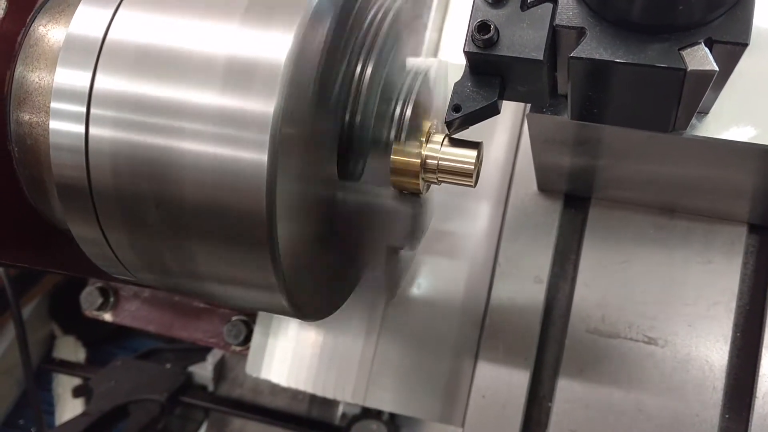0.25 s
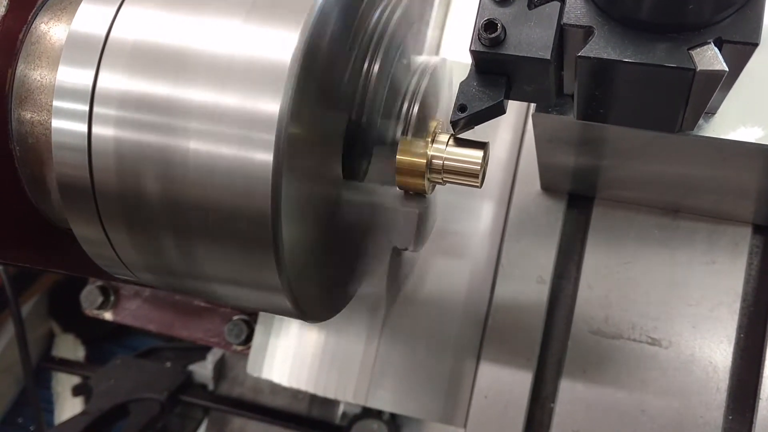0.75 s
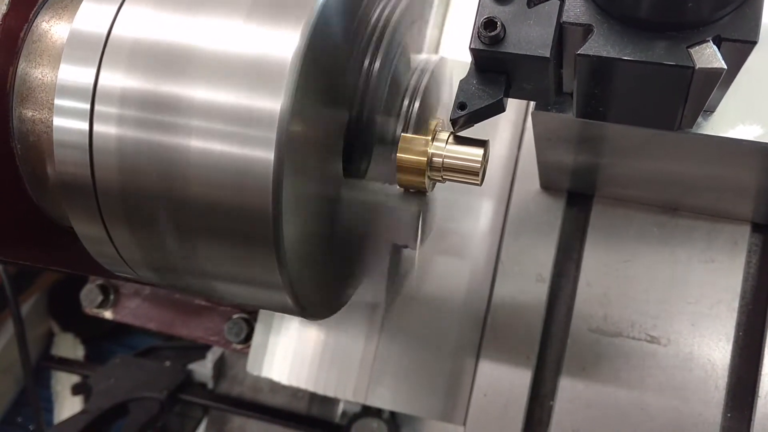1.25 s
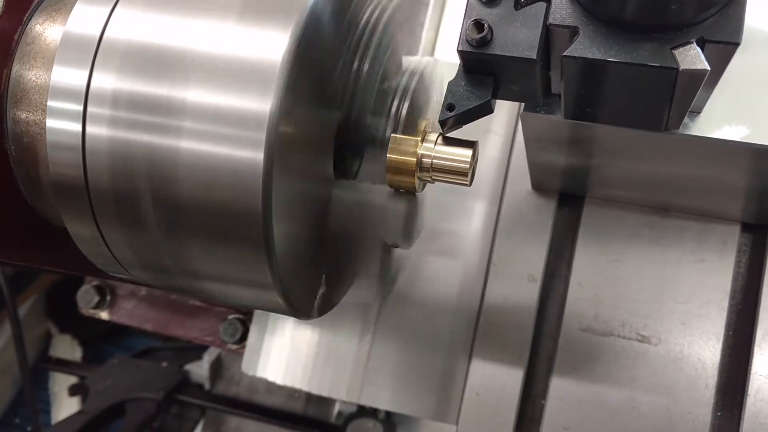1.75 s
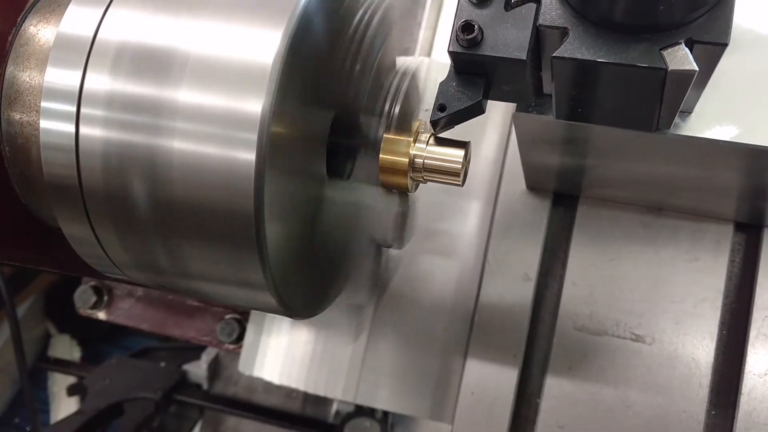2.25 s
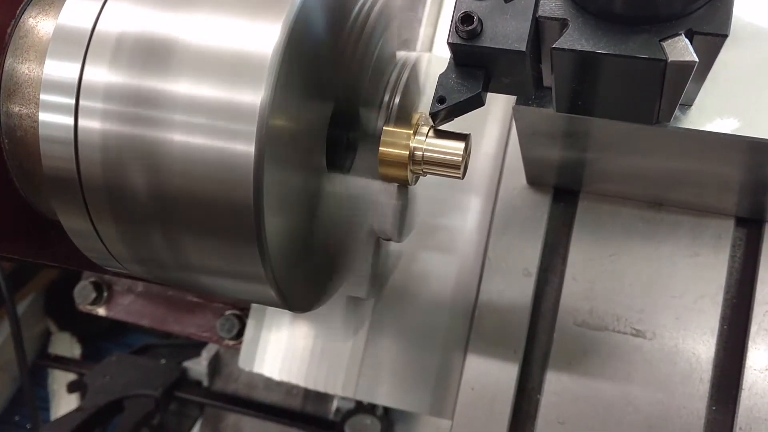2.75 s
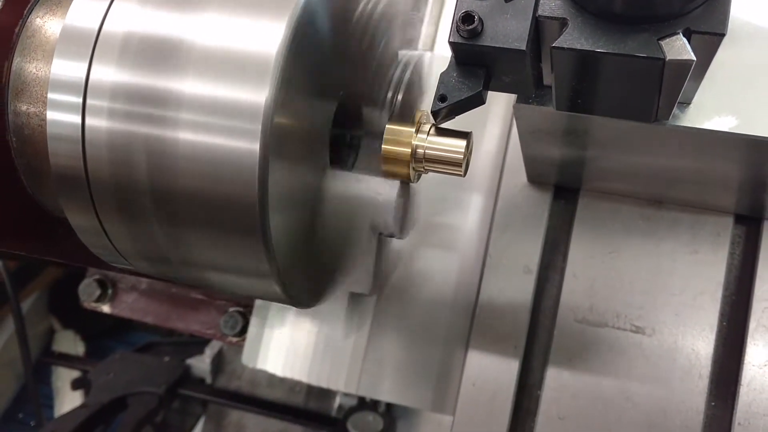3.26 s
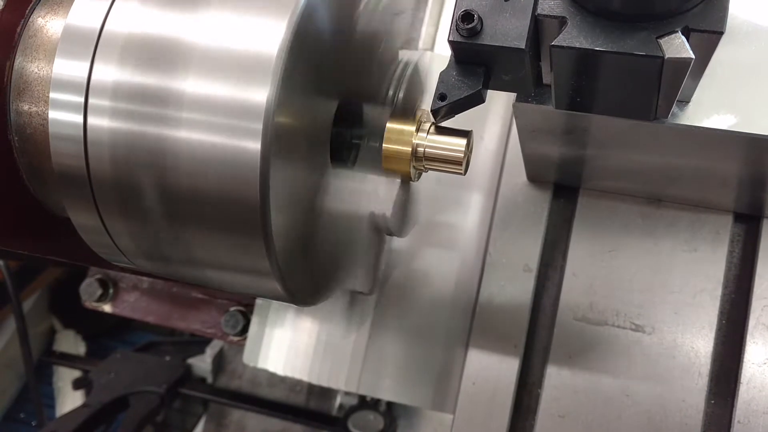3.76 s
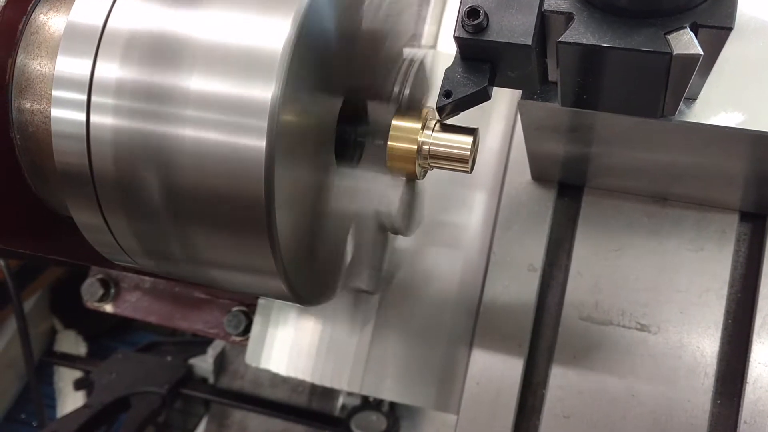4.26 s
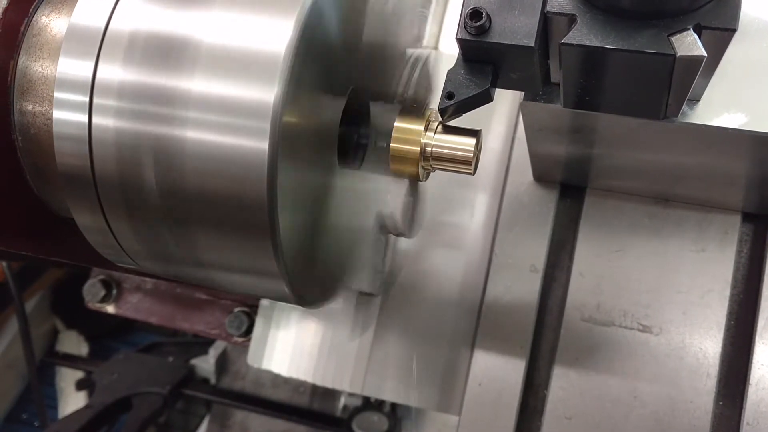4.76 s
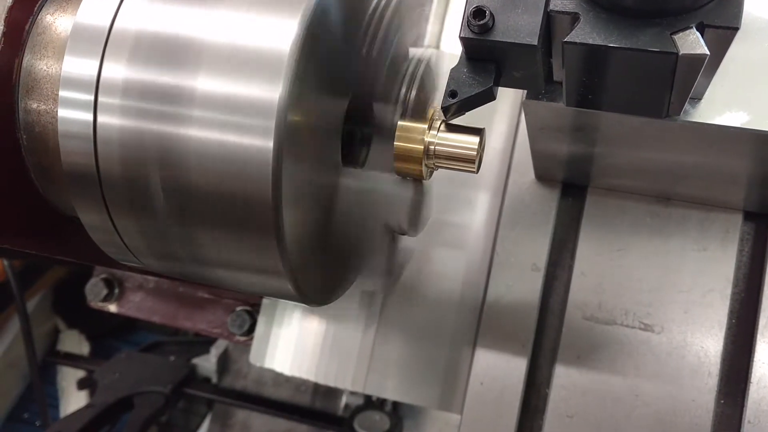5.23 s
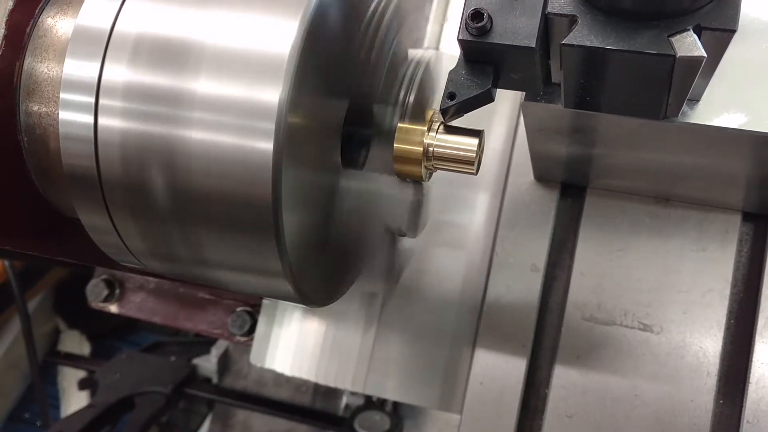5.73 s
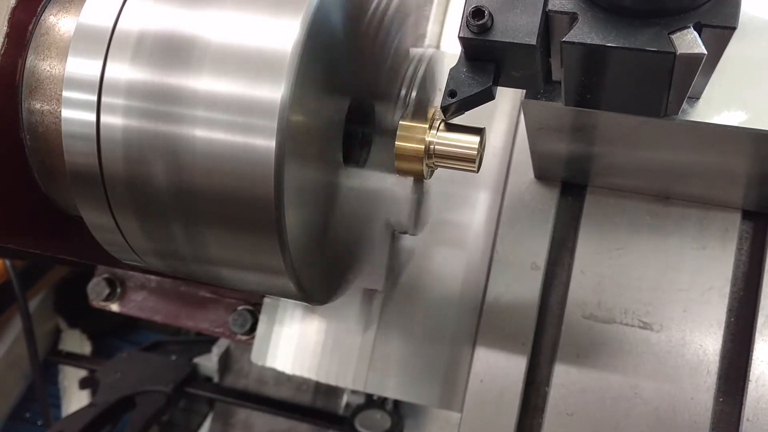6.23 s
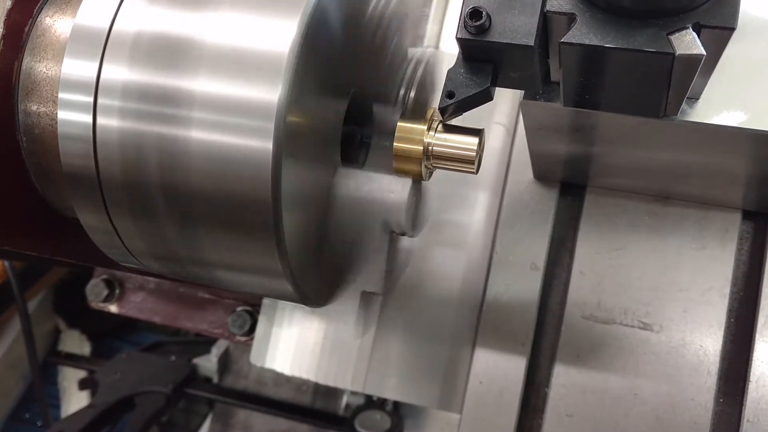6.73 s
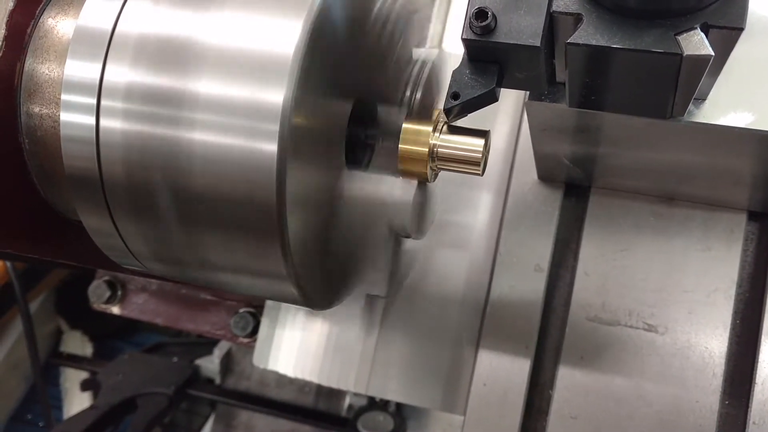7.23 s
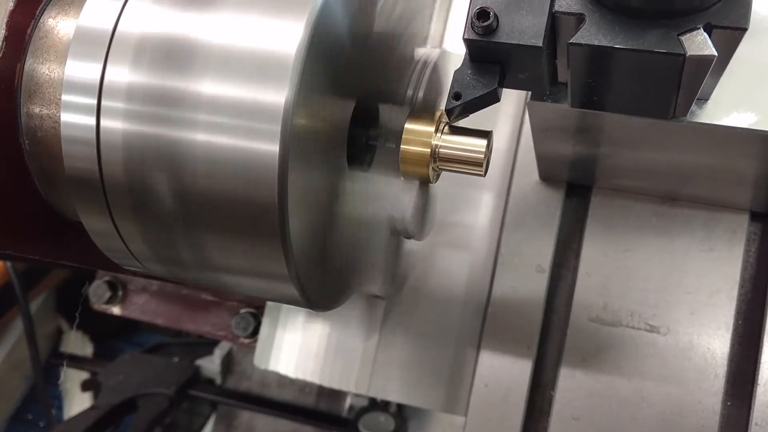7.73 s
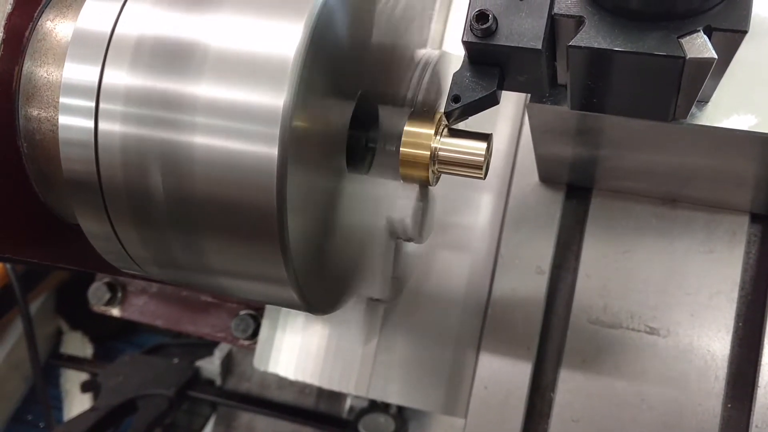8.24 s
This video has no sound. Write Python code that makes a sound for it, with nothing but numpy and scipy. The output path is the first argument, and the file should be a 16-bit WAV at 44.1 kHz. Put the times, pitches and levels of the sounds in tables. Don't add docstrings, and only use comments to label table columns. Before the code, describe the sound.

Continuous machine noise from a turning lathe, close and dry, with wide stereo texture. A belt bumps the bed in a lumpy bass rhythm, gears grind softly, and the spinning chuck chops a breathy hiss. Short ringing ticks lean right on each quick turn, and irregular gear slaps clack against the hollow casting. The middle is smoother, with fewer ticks and rare knocks, before the rattle comes back.

```python
import sys
import numpy as np
from scipy import signal
from scipy.fft import rfft, irfft, next_fast_len
from scipy.io import wavfile
from scipy.ndimage import uniform_filter1d

SR = 44100
rng = np.random.default_rng(int(sys.argv[2]) if len(sys.argv) > 2 else 0)


def undo_db(level):
    steps = np.asarray(level, float) / 20
    return 10 ** steps


def inscribe(sig):
    pcm = np.round(np.clip(np.atleast_2d(sig).T, -1, 1) * 32767)
    wavfile.write(sys.argv[1], SR, pcm.astype(np.int16))


N = 374409

SPINDLE_S = .11586

# start in seconds, peak level in dB, brightness in dB per octave.
HARD_KNOCKS = [(0.144, -18, -1), (0.257, -12.5, -4.5), (0.489, -11, -2), (0.836, -18, -4.5),
               (0.952, -15.5, -4), (1.068, -12, -8.5), (1.3, -8.5, -1), (1.88, -10.5, -4.5),
               (2.229, -19.5, -5), (2.92, -19.5, -3.5), (3.038, -13.5, -6), (3.975, -20, 0),
               (4.427, -16, -4), (4.545, -15.5, -6.5), (4.662, -17.5, -7), (4.778, -18, -3),
               (4.893, -12, -2), (5.008, -12, -3), (5.241, -16, -4.5), (5.355, -19, 0),
               (5.588, -14.5, -3.5), (6.512, -18, -4), (6.743, -9, -3.5), (7.092, -20.5, -6),
               (7.205, -19, -1), (7.327, -14.5, -9), (7.554, -10.5, -6), (7.789, -10.5, -3.5),
               (7.907, -21, -5), (8.133, -12, -6)]


def at_hz(points, hz, axis=1):
    points = np.array(points)
    return np.interp(np.log(hz + 1), np.log(points[:, 0]), points[:, axis])


def drift(rate):
    r = np.exp(-80 * np.pi * rate / SR)
    slow = signal.lfilter([1], [1, -2 * r, r * r], rng.standard_normal(N // 40 + 2002))[2000:]
    return np.interp(np.arange(N) / 40, np.arange(len(slow)), slow / slow.std())


def ring(clicks, hz, t60):
    r, w = undo_db(-60 / (t60 * SR)), 2 * np.pi * hz / SR
    return signal.lfilter([0, np.sin(w)], [1, -2 * r * np.cos(w), r * r], clicks + 1e-18)


def tone(hz, db, lead=0):
    cycles = hz * np.arange(N) / SR + rng.random()
    return np.sqrt(2) * undo_db(db) * np.sin(2 * np.pi * cycles + lead)


def noise(colour):
    # pitch in Hz, width in Hz, level in dB.
    panels = [(160, 16.6, 8), (205, 7.2, 14), (282, 13.4, 9), (428, 16.7, 9.5), (463.4, 19, 7.5),
              (687, 13, 5), (770, 12, 3), (742, 9, 4), (907, 10, 10.5), (1016, 12, 0.5), (1251, 47, 8),
              (1549, 48, 8), (2930, 65, 5), (3650, 42, 4.5), (6532, 420, 12.5), (4300, 200, 6),
              (5000, 300, 5), (7470, 250, 5), (8850, 250, -5), (9190, 300, 5), (10330, 400, 4),
              (12150, 300, 2), (12600, 250, 5), (13400, 500, 6)]
    size = next_fast_len(N)
    hz = np.fft.rfftfreq(size, 1 / SR)
    peaks = sum(db / (1 + (2 * (hz - at) / width) ** 2) for at, width, db in panels)
    spectrum = rfft(rng.standard_normal((2, size))) * undo_db(at_hz(colour, hz) + peaks)
    out = irfft(spectrum, size)[:, :N]
    return out / out.std()


def each_turn(first_s, db, spread_db, jitter_s, odd=()):
    chance = rng.standard_normal((int((N / SR - first_s) / SPINDLE_S) + 1, 2))
    s = first_s + SPINDLE_S * np.arange(len(chance)) + jitter_s * chance[:, 0]
    level = db + spread_db * chance[:, 1]
    for row in odd:
        turn = round((row[0] - first_s) / SPINDLE_S)
        s[turn], level[turn] = row[:2]
    return s, level


def spindle_load():
    # time in seconds, level in dB.
    load_points = [(0.0, -35), (0.12, -30), (0.38, -29.5), (0.66, -33), (0.87, -30), (1.04, -28.5),
                   (2.98, -31), (3.07, -30), (4.4, -30.5), (4.63, -29.5), (5.51, -29), (5.72, -30.5),
                   (7.87, -28.5), (8.49, -30)]
    return np.interp(np.arange(N) / SR, *np.transpose(load_points))


def rumble(lumps, swing_db):
    # pitch in Hz, density in dB per Hz.
    rumble_colour = [(30, -60), (45, -26), (85, -60), (110, -6.5), (150, -11.5), (300, -6), (350, -14.5),
                     (500, -36), (1500, -95)]
    throb_db = 10 * np.log10(uniform_filter1d(lumps ** 2, 1500) / np.mean(lumps ** 2) + 0.25)
    level_db = -32.5 + 0.65 * swing_db + 0.1 * throb_db + 0.69 * drift(4.8)
    return undo_db(level_db) * noise(rumble_colour)


def air(swing_db):
    # pitch in Hz, density in dB per Hz.
    hiss_colour = [(1800, -23), (2500, -5.5), (3600, -1), (4700, -5), (5600, -3), (7000, -8), (9000, -4),
                   (10200, -12.5), (11200, -11), (12500, -10.5), (13100, -11), (13800, -24), (14400, -15),
                   (15200, -12)]
    # upper edge in Hz, swing in dB at three a turn,
    # swing in dB at six a turn, random flutter in dB.
    pitch_ranges = [(5040, 0.63, 1.05, 1.7), (8200, 0.2, -0.1, 1.2), (12300, 1.6, 2, 1.87),
                    (17000, -2.5, -2.5, 1)]
    turn = np.arange(N) / SR / SPINDLE_S
    rest, out = noise(hiss_colour), 0
    for cut_hz, third_db, sixth_db, flutter_db in pitch_ranges:
        low = signal.sosfiltfilt(signal.butter(4, cut_hz, fs=SR, output="sos"), rest)
        jaws_db = third_db * np.cos(6 * np.pi * (turn - .2)) + sixth_db * np.cos(12 * np.pi * (turn - .04))
        out = out + low * undo_db(jaws_db + flutter_db * drift(6.5))
        rest = rest - low
    return out * undo_db(-35.5 + 0.22 * swing_db)


def motor_whine():
    # sideband number, rms level in dB, left minus right in dB, radians by which left leads.
    sidebands = [(-6, -73, 2, -.4), (-4, -67, 3, 2.1), (-3, -62.5, 3.5, 1.6), (-2, -70, 3.5, .1),
                 (-1, -71.5, -1.5, -1), (0, -61.5, -1.5, -1.3), (1, -66, 1, .1), (2, -77, 0, 3),
                 (3, -64.5, 1.5, 2.9), (6, -69, 0, 3.1)]
    carrier_hz, field_hz = 15086.6, 51.27
    out = 0
    for k, db, pan_db, lead in sidebands:
        port_db = db + np.array([[pan_db / 2], [-pan_db / 2]])
        out = out + tone(carrier_hz + k * field_hz, port_db, np.array([[lead], [0]]))
    return out


def spindle_tones():
    # multiple of the turn rate, rms level in dB.
    turn_tones = [(5, -66), (6, -66), (7, -67), (53, -47), (54.46, -52), (56, -54)]
    return sum(tone(k / SPINDLE_S, db + .1) for k, db in turn_tones)


def whirr(load_db):
    # pitch in Hz, density in dB per Hz.
    whirr_colour = [(250, -36), (330, -10), (400, -5.5), (600, -0.5), (1250, -5.5), (1400, -11.5),
                    (1800, -11), (2400, -13), (3200, -32), (7000, -80)]
    # share of the turn, level in dB.
    mesh_points = [(0, -5), (.08, -2), (.17, -2), (.25, -3), (.43, 0.5), (.47, -5), (.54, -1.5), (.6, -0.5),
                   (.7, -3), (.76, -2.5), (.87, -0.5), (1, -2.5)]
    turn = np.arange(N) / SR / SPINDLE_S
    mesh_db = np.interp(turn % 1, *np.transpose(mesh_points))
    return undo_db(2.57 + load_db + mesh_db + 0.24 * drift(11.0)) * noise(whirr_colour)


def belt(t60=0.13, rise_s=0.0064, uneven_db=1.5):
    # time within the loop in seconds, pitch of the bed mode in Hz, level in dB.
    belt_lumps = [(0.0185, 290, -27), (0.039, 207, -34), (0.051, 150, -20.5), (0.0879, 160, -18.5),
                  (0.094, 211, -20.5), (0.1202, 205, -22), (0.1235, 144.3, -19), (0.1346, 169, -36),
                  (0.134, 282.3, -18.5), (0.1457, 172, -11), (0.1572, 207.4, -14.5), (0.1755, 150, -17),
                  (0.1844, 172, -29), (0.2032, 135, -23.5), (0.2182, 157.6, -16), (0.2275, 185, -25.5),
                  (0.2427, 204.3, -15.5), (0.2497, 158.5, -16), (0.276, 160, -18.5), (0.298, 150, -26.5),
                  (0.3184, 290, -33), (0.322, 158.6, -17.5), (0.345, 206, -22), (0.364, 150, -28)]
    loop_s = .36805
    out, t = np.zeros(N + 2 * SR), np.arange(SR // 4) / SR
    for s, hz, db in belt_lumps:
        swell = np.sin(2 * np.pi * hz * t) * undo_db(-60 * t / t60) * (1 - np.exp(-t / rise_s))
        for loop in range(-1, 24):
            at = round((1 + s + loop * loop_s) * SR)
            out[at:at + len(t)] += swell * undo_db(db - 3.5 + uneven_db * rng.standard_normal())
    return out[SR:SR + N]


def taps():
    # start in seconds, peak level in dB.
    odd_taps = [(0.323, -23.5), (0.556, -18), (0.788, -24), (0.903, -17), (1.019, -17.5), (1.715, -18),
                (2.1786, -25.5), (3.2199, -20), (3.3378, -23), (3.569, -26.5), (3.916, -26), (4.148, -18),
                (4.263, -25.5), (4.379, -26), (4.6114, -26), (4.728, -24.5), (5.1908, -23.5),
                (5.3054, -14.5), (5.42, -17.5), (5.656, -18), (5.77, -18.5), (5.8858, -18), (6.0007, -16),
                (6.8122, -18), (6.9261, -25), (7.161, -17.5), (7.275, -18), (7.3918, -24), (7.508, -25),
                (7.6246, -23.5)]
    # seconds after the tap, level in dB, spread in dB.
    light_touches = [
        (.071, -38, 3),
        (.083, -33, 2.5),
    ]
    # start in seconds, peak level in dB.
    firm_touches = [(0.5135, -27), (0.9866, -25), (1.219, -29), (1.3349, -27), (1.5638, -27), (1.916, -26),
                    (2.4917, -30), (2.608, -28), (5.03, -27), (5.1472, -28), (5.624, -30), (5.9683, -28),
                    (6.895, -26), (7.231, -26), (7.4734, -27), (7.5917, -26), (7.6919, -35), (8.172, -26),
                    (8.403, -28)]
    missed_turns = [5, 17, 20, 23, 26, 29, 32, 34]
    first_s = .0928
    s, db = each_turn(first_s, -21, 0, .0006, odd_taps)
    db[missed_turns] = -38
    light = [each_turn(first_s + late, touch_db, spread_db, .002) for late, touch_db, spread_db in light_touches]
    knock_s, knock_db = np.transpose(HARD_KNOCKS)[:2]
    shaken = (knock_s - .001, knock_db - 14)
    s, db = np.hstack([(s, db), *light, np.transpose(firm_touches), shaken])
    inside = s < N / SR
    return s[inside], db[inside]


def ticks():
    # pitch in Hz, level in dB, seconds to die by 60 dB.
    post_modes = [(3189, 6, 0.025), (3320, -6, 0.015), (2960, -10, 0.011), (3937, -13.5, 0.028),
                  (4300, -24, 0.028)]
    s, db = taps()
    out = np.zeros(N)
    for hz, mode_db, t60 in post_modes:
        uneven_db = 2.3 * rng.standard_normal(len(s)) * (mode_db < 0)
        clicks = np.zeros(N)
        clicks[np.round(s * SR).astype(int)] = undo_db(db + mode_db + uneven_db)
        out += ring(clicks, hz, t60) - ring(clicks, hz, 0.011)
    return out


def slaps():
    # start in seconds, peak level in dB.
    post_thuds = [(0.559, -16.5), (1.608, -16.5), (1.954, -21.5), (2.65, -21), (5.081, -23), (5.312, -19),
                  (5.661, -21), (5.892, -26), (6.821, -23), (7.28, -21), (7.629, -17)]
    s, db = each_turn(.0255, -29, 1.5, .002, HARD_KNOCKS)
    bright = np.full(len(s), 1.5)
    hard = np.array(HARD_KNOCKS)
    bright[np.isin(s, hard[:, 0])] = hard[:, 2]
    thud_s, thud_db = np.transpose(post_thuds)
    return np.r_[s, thud_s], np.r_[db, thud_db], np.r_[bright, np.full(len(thud_s), -7.)]


def knocks():
    # pitch in Hz, level in dB, seconds to die by 60 dB.
    casting_modes = [(277.8, -13, 0.21), (423, -20, 0.27), (556, -4, 0.077), (650, -10.5, 0.15),
                     (687, -9.5, 0.3), (770.4, -7, 0.21), (913.8, 1, 0.11), (1003, -1, 0.073),
                     (1137, 7, 0.027), (1265, 1, 0.058), (1566, 3.5, 0.019), (1860, -9.5, 0.054),
                     (2293, 2, 0.02), (3380, -13, 0.032), (4605, -8.5, 0.024)]
    bounces = [(0, 3.5), (.006, -2), (.013, -4), (.021, -8), (.033, -9.5), (.046, -8)]
    s, db, bright = slaps()
    out = np.zeros((2, N + SR))
    for hz, mode_db, t60 in casting_modes:
        clicks = np.zeros((2, N + SR))
        mode_late = 0.001216 * np.log2(2200 / hz)
        for late, bounce_db in bounces:
            chance = rng.standard_normal((len(s), 4))
            at = np.round((s + late + mode_late + 0.0595 * late * chance[:, 0]) * SR).astype(int)
            colour_db = bright * np.log2(hz / 900)
            size = undo_db(db + mode_db + bounce_db - 12 + colour_db + 2.2 * chance[:, 1])
            clicks[:, at] += size * np.sign(chance[:, 2:].T + 3 * (late == 0))
        out += ring(clicks, hz, t60)
    return signal.sosfilt(signal.butter(2, 200, "high", fs=SR, output="sos"), out[:, :N])


def ports(pair, related=0.47):
    # pitch in Hz, left minus right in dB,
    # radians by which left lags, unrelated sound in dB.
    port_table = [(45, 15.5, 1.1, -9), (90, -1.5, 1.5, -10), (150, -12.5, 1.17, -10), (238, -8, 0.64, -4.5),
                  (290, -5.5, .4, -12.5), (460, -8.5, 1.13, -1), (626, -4.5, 0.13, -14.5),
                  (816, -4, 0.38, -8.5)] + [(1200, -1, 0, -17), (3400, 0, 0, 0), (4200, 0, 0, 0), (6500, 4.5, .4, 0),
                                  (9300, 5.5, .5, 0), (12400, 7, .2, 0), (13600, 0, 0, 0)]
    # pitch in Hz, difference minus sum in dB.
    comb = np.array([(1250, -13), (1950, -1), (2610, 22), (3150, -4), (3720, -25), (4350, 1), (5200, 15.5),
                     (6500, -14), (7780, 13), (8900, -12), (9900, 3), (10700, 14), (11800, -11), (12550, 2),
                     (13150, 15), (14050, -11), (14900, 0), (15350, 14)])
    notch_hz = 2630
    size = next_fast_len(N)
    hz = np.fft.rfftfreq(size, 1 / SR)
    step = np.interp(hz, comb[:, 0], np.arange(len(comb)))
    step = step - np.sin(2 * np.pi * step) / (2 * np.pi) * 0.8
    comb_db = np.interp(step, np.arange(len(comb)), comb[:, 1])
    side_db = np.where(hz < comb[0, 0], at_hz(port_table, hz, axis=3), comb_db)
    angle = np.arctan(undo_db(side_db))
    direct, other = rfft(pair, size)
    turning = 1j * related * np.sin(2 * np.pi * (hz / notch_hz - .5)) * (hz > notch_hz / 2)
    mid = direct * np.cos(angle)
    side = (turning * direct + np.sqrt(1 - abs(turning) ** 2) * other) * np.sin(angle)
    tilt = undo_db(at_hz(port_table, hz) * np.cos(angle) ** 2 / 2)
    lag = np.exp(-1j * at_hz(port_table, hz, axis=2) * np.cos(angle) ** 2)
    return irfft([(mid + side) * tilt * lag, (mid - side) / tilt], size)[:, :N]


def scene():
    load_db = spindle_load()
    swing_db = load_db - load_db.mean()
    lumps = belt()
    thumps = (lumps + spindle_tones()) * [[1], [.1]]
    body = rumble(lumps, swing_db) + air(swing_db) + whirr(load_db) + thumps + knocks()
    post = ticks() * undo_db(np.array([[-8], [3]]))
    return ports(body) + motor_whine() + post


def top_cut(x):
    return signal.sosfilt(signal.butter(12, 15450, fs=SR, output="sos"), x)


def record(dry):
    level_db = 10 * np.log10(uniform_filter1d(np.mean(dry ** 2, axis=0), 441) + 1e-9)
    slope = 25 * np.arange(N) / SR
    held_db = np.maximum.accumulate(level_db + slope) - slope
    duck_db = uniform_filter1d(-.3 * np.maximum(held_db + 24.5, 0), 300)
    wind_cut = signal.butter(4, 38, "high", fs=SR, output="sos")
    mix = signal.sosfilt(wind_cut, dry * undo_db(duck_db + 0.89))
    return top_cut(mix)


dry = scene()
out = record(dry)
inscribe(out)
```